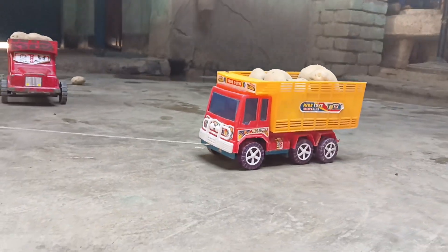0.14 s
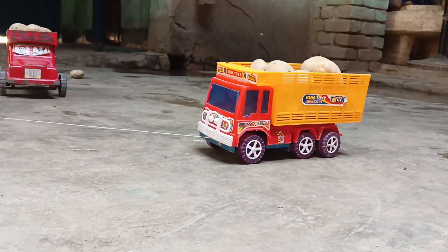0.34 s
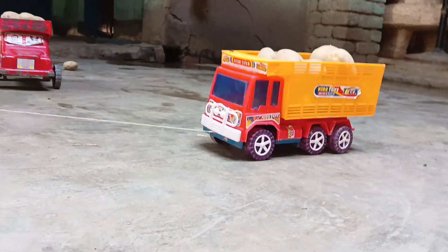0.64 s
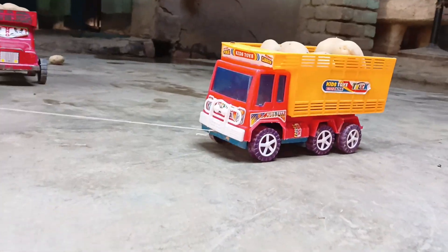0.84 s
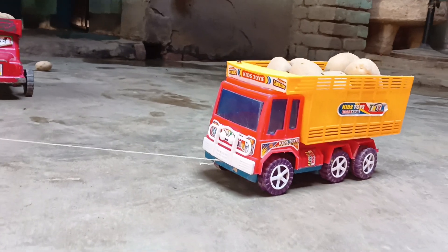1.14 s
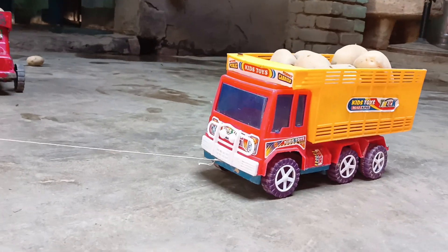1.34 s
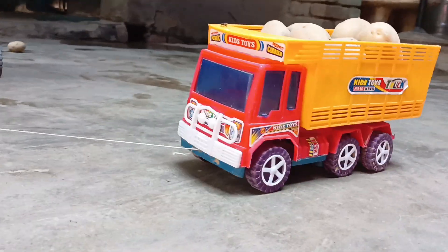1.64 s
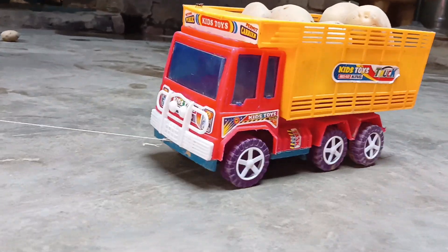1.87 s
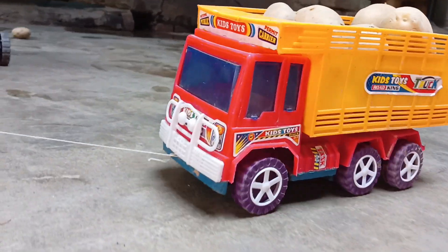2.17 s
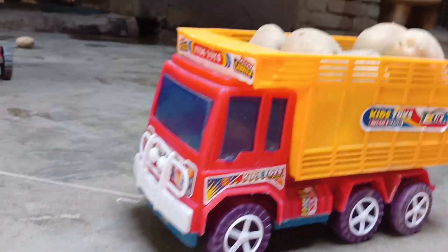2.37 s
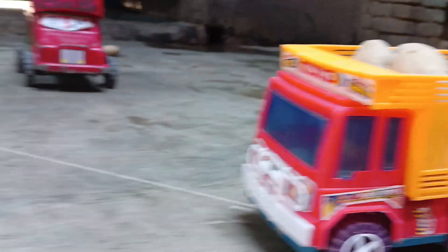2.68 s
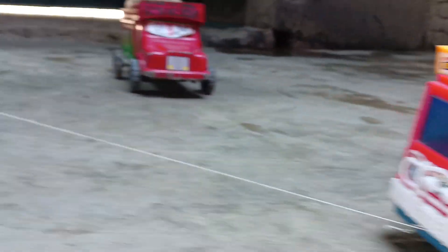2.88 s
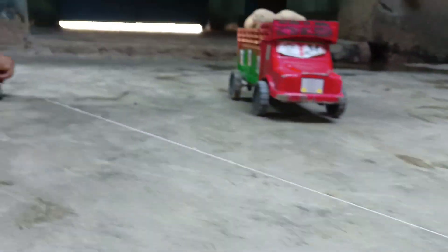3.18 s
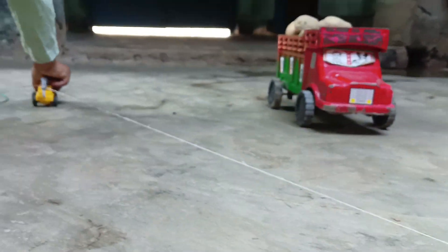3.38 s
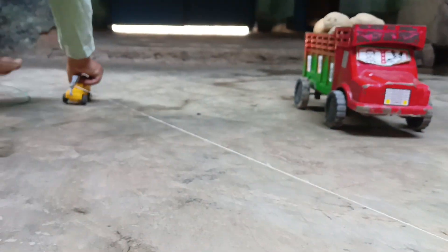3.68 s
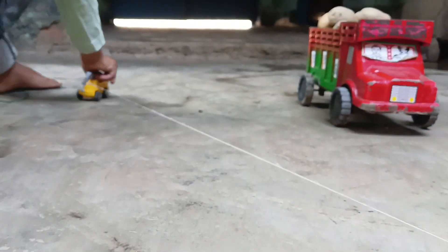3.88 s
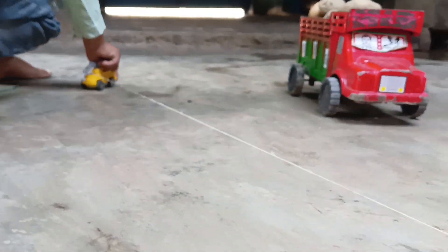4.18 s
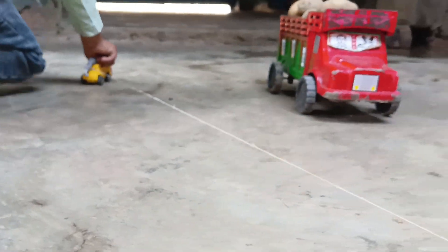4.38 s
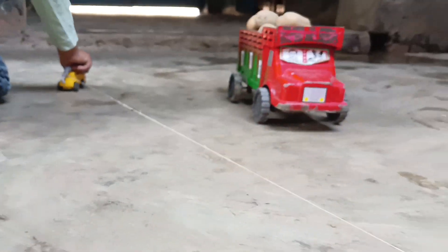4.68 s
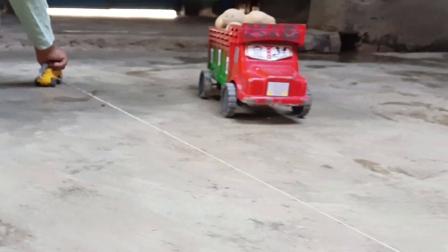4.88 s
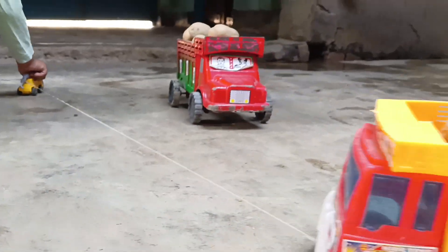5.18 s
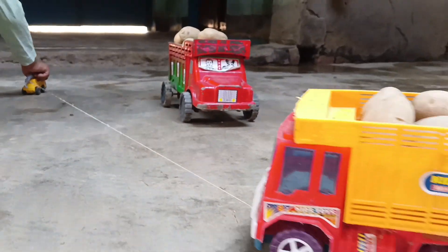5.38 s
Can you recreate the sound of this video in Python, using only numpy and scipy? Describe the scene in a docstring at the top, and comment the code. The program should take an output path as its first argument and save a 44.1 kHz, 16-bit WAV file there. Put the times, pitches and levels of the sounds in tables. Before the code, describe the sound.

A hollow plastic toy truck rattles in jerky pulls over rough concrete in a bare room, ending with one hard jolt of its load.

```python
"""Toy trucks on rough concrete

In a bare masonry room a distant toy rolls first, then a yellow truck close by, then a red one, on strings.
Random contacts, ticks and pits drive each toy's resonant colour; wheel slaps bunch the upper layers.
Tread lugs ring damped notes of the hollow body; hard parts clack and grit snaps in short noise bursts.
Soft footfalls, one hard jolt of the potato load, still air and a decaying noise tail complete the place."""
import sys
import numpy as np
from scipy import signal
from scipy.fft import rfft, irfft, next_fast_len
from scipy.io import wavfile
from scipy.ndimage import uniform_filter1d, map_coordinates

SR = 44100
rng = np.random.default_rng(int(sys.argv[2]) if len(sys.argv) > 2 else 0)


def store_pcm(level_fs):
    """Save levels as 16-bit WAV."""
    pcm = np.round(np.clip(level_fs, -1, 1) * 32767).astype(np.int16)
    wavfile.write(sys.argv[1], SR, np.atleast_2d(pcm).T)


N = 243431

# still air of the room: (frequency [Hz], relative density [dB per Hz])
AIR_COLOUR = [(15, -60), (25, -23), (69, -9), (169, 6.5), (349, 0.5), (1570, 2.5), (2490, -26),
              (4620, -13.5), (9050, -3.5), (15500, -19)]
# decay of the bare room: (frequency [Hz], t60 [s])
ROOM_DECAY = [(100, 0.89), (1000, 0.83), (3000, 0.91), (12000, 0.21)]
# footfalls: (time [s], level before the part gains [dB], centre [Hz])
FOOTFALLS = [(.631, -42, 220), (.752, -40, 190), (.835, -34, 180), (1.184, -12, 140), (1.624, -13, 112),
             (2.012, -27, 110), (3.961, -27, 134)]

# broad colour of each toy and of the juddering wheel: (frequency [Hz], relative density [dB per Hz])
DISTANT_COLOUR = [(35, -39), (60, -9), (87, -5), (120, -17), (423, -23), (1700, -19), (2530, 2),
                  (3340, -16), (3670, -14), (4740, -32), (6870, -22), (7720, -24), (9970, -10),
                  (12300, -22), (15500, -22)]
YELLOW_COLOUR = [(35, -63), (60, -17), (142, -8.5), (278, -9), (423, -7.5), (673, -6.5), (910, -3),
                 (1020, -3), (1380, -6), (1670, -4.5), (2050, -6), (2840, -4.5), (4630, -24), (9740, -7),
                 (15500, -13)]
JUDDER_COLOUR = [(35, -36), (60, -17), (145, -5), (206, -55), (385, -14), (423, -30), (721, -14),
                 (810, -40), (999, 3), (1910, 2.5), (2710, 17), (4630, -14), (6120, -6), (8670, -10),
                 (15500, -14)]
RED_COLOUR = [(35, -77), (60, -16), (142, -12), (376, -6), (546, -10), (889, -4), (1260, -8), (1520, -9.5),
              (2910, -9), (4520, -24), (6120, -18), (7200, -17), (9080, -4), (10400, -13), (15500, -13)]
# resonances standing on each colour: (frequency [Hz], width [Hz], level over the colour [dB])
DISTANT_RESONANCES = [(1850, 600, 5), (6800, 900, 3), (9000, 1500, 2)]
YELLOW_RESONANCES = [(655, 27, 6.5), (733, 52, 8.5), (1025, 170, 5), (1663, 88, 3.5), (2460, 67, 4.5),
                     (2990, 100, 3), (5800, 290, 2), (9400, 3900, 7.5)]
JUDDER_RESONANCES = [(717, 91, 9.5), (1000, 37, 3.8), (3020, 1800, 2.5), (6000, 410, 6), (8350, 1100, 10),
                     (14200, 1500, 6)]
RED_RESONANCES = [(700, 100, 1.8), (830, 130, 3.3), (1050, 66, 8.6), (1295, 73, 9.3), (2147, 49, 4.5),
                  (2700, 410, 1.5), (6250, 370, 4.2), (8650, 6600, 5.7)]
# pulls on each toy, and spells in which a wheel of the yellow truck judders:
# (start [s], length [s], hollow body gain [dB], thin panel gain [dB], grit gain [dB])
DISTANT_TUGS = [(0.0, 0.017, -55, -45.5, -46), (.12, 0.086, -51, -44, -48), (.32, 0.099, -61, -47.5, -48.5),
                (.47, 0.1, -52.5, -43.5, -50.5), (.62, 0.64, -53, -52, -66)]
YELLOW_TUGS = [(1.1, 0.1, -29.5, -35.5, -42.5), (1.29, 0.083, -25, -32.5, -44), (1.47, 0.11, -28, -35, -47),
               (1.63, 0.11, -31, -31, -36), (1.88, 0.18, -27.5, -33, -40.5),
               (2.21, 0.074, -30, -32.5, -33.5), (2.39, 0.36, -31, -36.5, -40),
               (5.12, 0.12, -27.5, -34.5, -37.5), (5.29, 0.17, -26, -27, -30.5)]
JUDDER_SPELLS = [(2.77, 0.18, -37, -30, -31), (5.09, 0.093, -34, -32.5, -33.5)]
RED_TUGS = [(2.98, 0.11, -42, -45.5, -44), (3.21, 0.032, -37.5, -35, -40), (3.34, 0.087, -40, -36, -35.5),
            (3.52, 0.097, -42, -43.5, -46), (3.7, 0.032, -34.5, -37.5, -39), (3.86, .27, -40, -42.5, -43.5),
            (4.27, 0.014, -34.5, -48, -51), (4.36, 0.084, -38.5, -38, -40), (4.49, 0.15, -28, -32.5, -30),
            (4.84, 0.11, -31, -39, -31.5)]
# a loose wheel slaps its axle: (time [s], rate [slaps per s])
WHEEL_SLAP_RATE = [(1.4, 45), (2.1, 64.5), (2.7, 99), (3.2, 74), (5.1, 72)]

# single grains of sand snap under a wheel: (time [s], level before the part gain [dB])
GRAIN_SNAPS = [(0.0546, -29), (0.3435, -31), (1.1927, -19), (1.266, -18), (1.7998, -11), (1.8286, -18),
               (1.8621, -18), (1.875, -19), (1.923, -21), (2.2503, -15), (2.538, -19), (2.8226, -7),
               (3.022, -21), (3.0649, -19), (3.1526, -18), (4.6073, -9), (5.0438, -16), (5.2392, -11)]
# a wheel skids sideways: (time [s], peak [dB], t60 [s], centre [Hz], sharpness Q [1])
WHEEL_SKIDS = [(1.724, -16, 0.13, 4600, 3), (3.21, -33, .12, 5290, 14), (3.365, -29, .12, 5500, 22.3),
               (3.418, -26, 0.039, 5330, 25)]
# hard plastic parts meet: (time [s], level before the part gains [dB], treble relative to it [dB])
PART_CLACKS = [(0.1869, -26, -10), (0.816, -24, -27), (1.1227, -15, -21), (1.5657, -19, -12),
               (1.715, -1, -22), (2.0252, -16, -10), (2.2651, -15, -10), (2.352, -14, -15),
               (2.538, -19, -9), (3.1518, -20, -8), (3.4235, -14, -13), (3.7677, -21, -14),
               (3.7787, -18, -12), (3.8221, -22, -18), (4.7006, -20, -8), (4.9905, -16, -7),
               (5.028, -9, -14), (5.0882, -9, -13), (5.0998, -8, -11), (5.1651, -12, -11),
               (5.2588, -6, -17)]
# the hardest bumps knock the body, and the last row is the load rebounding after its jolt: (time [s], level
# before the part gains [dB], note [Hz])
LUG_KNOCKS = [(0.882, -29, 697), (1.012, -19, 926), (1.064, -13, 1070), (1.117, -14, 732),
              (1.203, -14, 689), (1.372, -13, 980), (1.386, -12, 1070), (1.415, -12, 972),
              (1.458, -12, 974), (1.548, -16, 654), (1.65, -11, 1060), (1.87, -11, 1000),
              (2.012, -13, 1030), (2.142, -15, 1040), (2.537, -20, 770), (2.766, -15, 1030),
              (3.53, -28, 1010), (3.716, -23, 1020), (4.251, -23, 942), (4.568, -12, 867),
              (5.085, -12, 1070), (5.33, -12, 1120)]
# the load jolts against the bed and bounces: (time [s], peak of each blow [dB])
LOAD_JOLTS = [(5.2622, -2.5), (5.2665, -6.5)]
# modes of the loaded bed: (frequency [Hz], relative level [dB], t60 [s])
BED_MODES = [(669, -8.5, 0.12), (896, 5, 0.023), (1115, 9.5, 0.044), (1350, -16, .053), (1594, 5, 0.032),
             (1940, 9.5, 0.012)]

HIT_SIZE = 8192  # samples in one impact or impulse response
HIT_T = np.arange(HIT_SIZE) / SR
HIT_HZ = np.fft.rfftfreq(HIT_SIZE, 1 / SR)
TOP_HZ = 15900  # band limit of the phone
KNOCK_PANEL_DB = -9.5  # panel rattle of a knock, over its table level
CLACK_HZ, CLACK_SCATTER = 2583, 0.067  # panel note, and its spread in natural-log pitch
EDGE_DB = 8.5  # bright edge of a clack, over its treble level
SNAP_HZ, SNAP_SCATTER = 9900, 0.08  # pitch of a grain, and its spread in natural-log pitch
PATCHES_PER_S, PATCH_DB = 16, 1.83  # sandy and smooth floor patches: rate, spread of the grit level


def amp(db):
    """Decibels to gain."""
    return 10 ** (np.asarray(db) / 20)


def unit(x):
    """Scale to rms 1."""
    return x / np.sqrt(np.mean(x ** 2) + 1e-20)


def along(points, hz):
    """Read (Hz, value) points on a log frequency axis."""
    f, v = np.transpose(points)
    return np.interp(np.log(hz + 1), np.log(f + 1), v)


def curves(rows):
    """One value per sample for each column after the time."""
    s, *cols = np.transpose(rows)
    return [np.interp(np.arange(N) / SR, s, c) for c in cols]


def add(track, s, sound):
    """Mix a sound in at time s."""
    start = round(s * SR)
    track[start:start + len(sound)] += sound[:N - start]


def ring(gain):
    """Causal impulse response with the shape of a gain on HIT_HZ, its peak gain set to 1."""
    cepstrum = irfft(np.log(np.maximum(gain / gain.max(), 1e-6)))
    # folding the cepstrum forward in time makes the response minimum-phase
    fold = 1 + np.sign(HIT_SIZE // 2 - np.arange(HIT_SIZE))
    fold[0] = 1
    return irfft(np.exp(rfft(cepstrum * fold)))


def through(x, gain):
    """Send x through a causal colour."""
    return signal.fftconvolve(x, ring(gain))[:len(x)]


def colour(spectrum, resonances):
    """Gain of a broad spectrum with resonances standing on it."""
    peaks = sum(db / (1 + (2 * (HIT_HZ - hz) / width) ** 2) for hz, width, db in resonances)
    return amp(along(spectrum, HIT_HZ) + peaks)


def below(hz, order=6):
    """Low-pass gain."""
    return 1 / np.sqrt(1 + (HIT_HZ / hz) ** (2 * order))


def above(hz, order=6):
    """High-pass gain."""
    return np.sqrt(1 - below(hz, order=order) ** 2)


def bump(hz, q):
    """Gain of one resonance."""
    return 1 / np.sqrt(1 + q ** 2 * ((HIT_HZ + 1) / hz - hz / (HIT_HZ + 1)) ** 2)


def strike(gain, t60):
    """A rough contact, a noise burst decaying over t60, rings a colour; peak 1."""
    hit = through(rng.standard_normal(HIT_SIZE) * amp(-60 * HIT_T / t60), gain)
    return hit / np.abs(hit).max()


def note(hz, t60, attack):
    """One damped resonance set going by a push with a soft onset."""
    return np.sin(2 * np.pi * hz * HIT_T) * amp(-60 * HIT_T / t60) * (1 - np.exp(-HIT_T / attack))


def ticks(rate, low_hz, high_hz, cycles, spread_db):
    """Small impacts, each on another spot with its own pitch, ringing for some cycles; rms 1."""
    chance = rng.random((int(rate * N / SR), 3))
    hz = low_hz * (high_hz / low_hz) ** chance[:, :1]
    n = np.arange(int(cycles / low_hz * SR))
    turns = hz * n / SR
    age = turns / cycles
    size = amp(spread_db * chance[:, 1:2] ** 2)
    grains = size * np.sin(2 * np.pi * turns) * age * np.exp(-np.log(1000) * age)
    at = (chance[:, 2:] * N).astype(int) + n
    return unit(np.bincount(at.ravel(), grains.ravel(), N)[:N])


def still_air():
    """Steady noise in the colour of the quiet room."""
    return amp(-50.5) * unit(through(rng.standard_normal(N), amp(along(AIR_COLOUR, HIT_HZ))))


def room(x):
    """Bare walls answer after a 12 ms delay; the highest treble dies first."""
    hz, t, z = signal.stft(rng.standard_normal(SR), SR, nperseg=256)
    decay = amp(-60 * t / along(ROOM_DECAY, hz)[:, None])
    tail = signal.istft(z * decay, SR, nperseg=256)[1]
    tail = np.pad(tail, (round(.012 * SR), 0))
    return signal.fftconvolve(x, tail / np.linalg.norm(tail))[:N]


def footfalls():
    """A heel gives one dull push on the concrete, and the sole settles in a longer low burst."""
    out = np.zeros(N)
    for s, db, hz in FOOTFALLS:
        heel = note(hz, t60=.034, attack=.002)
        sole = strike(above(110, order=4) * below(300, order=4), t60=.075)
        add(out, s, amp(db + 4.5) * heel)
        add(out, s, amp(db - 3.5) * sole)
    return out


def jolt():
    """The load hits the hollow bed, which rings in its modes; then the potatoes tumble to rest."""
    out = np.zeros(N)
    bed = sum(amp(db) * note(hz, t60, attack=0.00034) for hz, db, t60 in BED_MODES)
    bed = through(bed, above(360, order=3) * below(3100, order=3))
    for s, db in LOAD_JOLTS:
        add(out, s, amp(db) * bed / np.abs(bed).max())
    tumble = unit(ticks(600, 1000, 2300, cycles=14, spread_db=6)[:SR // 2])
    fade_db = -16.5 - 60 * np.arange(SR // 2) / SR / 0.24  # t60 0.24 s
    add(out, LOAD_JOLTS[-1][0] + 0.012, amp(fade_db) * tumble)
    return out


def sand():
    """Single grains snap under the wheels, and sideways skids rasp over them."""
    out = np.zeros(N)
    for s, db in GRAIN_SNAPS:
        hz = SNAP_HZ * np.exp(SNAP_SCATTER * rng.standard_normal())
        snap = strike(bump(hz, q=7) * above(6500), t60=.01)
        add(out, s + .0015, amp(db - .5) * snap)
    for s, db, t60, hz, q in WHEEL_SKIDS:
        add(out, s, amp(db) * strike(bump(hz, q) * below(6200) * above(1500), t60=t60))
    return out


def clacks():
    """Hard parts meet briefly: a panel note, a dry crack and a bright edge."""
    out, truck = np.zeros(N), colour(YELLOW_COLOUR, YELLOW_RESONANCES)
    for s, db, treble_db in PART_CLACKS:
        hz = CLACK_HZ * np.exp(CLACK_SCATTER * rng.standard_normal())
        crack_t60 = 0.016 * amp(-db / 3)  # light touches rattle on, a hard blow is over sooner
        add(out, s, amp(db + 3) * note(hz, t60=.007, attack=.0005))
        add(out, s, amp(db - 4.5) * strike(above(1600) * below(3500), crack_t60))
        add(out, s, amp(db + treble_db + EDGE_DB) * strike(truck * above(4800), t60=.018))
    return out


def knocks():
    """Each lug lands, or the load rebounds, and rings one note of the hollow body, with a rough thud and a
    panel rattle."""
    out, truck = np.zeros(N), colour(YELLOW_COLOUR, YELLOW_RESONANCES)
    for s, db, hz in LUG_KNOCKS:
        thud = strike(truck * above(500) * below(1900), t60=.018)
        rattle = strike(truck * above(1500) * below(2800), t60=.028)
        add(out, s, amp(db + 5.5) * note(hz, t60=.025, attack=.0018))
        add(out, s, amp(db - 6) * thud)
        add(out, s, amp(db + KNOCK_PANEL_DB) * rattle)
    return out


def contacts(rate, spread_db):
    """Tiny random impacts of uneven size on the rough floor; rms 1."""
    hits = rng.random(N) < rate / SR
    signs = rng.choice([-1, 1], N)
    sizes = amp(spread_db * np.clip(rng.standard_normal(N), -2, 2))
    return unit(hits * signs * sizes)


def slaps(rate, jitter, size_db, t60):
    """Power envelope of a loose wheel slapping its axle at an uneven rate; mean 1."""
    turns = np.cumsum(rate) / SR
    chance = rng.uniform(-1.2, 1, (int(turns[-1]), 2))
    at = np.searchsorted(turns, np.arange(len(chance)) + jitter * chance[:, 0])
    pulses = np.bincount(at, amp(size_db * chance[:, 1]) ** 2, N + 1)[:N] / rate
    power = np.abs(signal.fftconvolve(pulses, amp(-60 * HIT_T / t60) ** 2)[:N])
    return power / power.mean()


def pulled(pulls, rise_db_per_s, coast_db_per_s):
    """A toy swells into each pull, holds and fades as it coasts; gains of body, panels and grit."""
    t = np.arange(0, N, 64) / SR
    each = []
    for start, length, *levels in pulls:
        rise_db = rise_db_per_s * np.maximum(start - t, 0)
        coast_db = coast_db_per_s * np.maximum(t - start - length, 0)
        each.append(np.array(levels)[:, None] - rise_db - coast_db)
    # the loudest pull at each moment prevails
    return curves(np.column_stack([t, *amp(np.max(each, axis=0))]))


def wander(x, depth_db):
    """As a truck moves, its paths over the floor to the microphone change and its colour drifts."""
    z = signal.stft(x, nperseg=512)[2]
    field = rng.standard_normal(z.shape)
    for _ in range(2):
        field = uniform_filter1d(uniform_filter1d(field, size=7, axis=0), size=22, axis=1)
    return signal.istft(z * amp(depth_db * unit(field)), nperseg=512)[1][:N]


def rolling():
    """Roughness shakes body and panels and grinds grit; slaps bunch the contacts, pits jar the toy."""
    slap = slaps(curves(WHEEL_SLAP_RATE)[0], jitter=.3, size_db=5, t60=.025)
    pits = contacts(45, spread_db=3)
    patch_at = np.arange(N) * PATCHES_PER_S / SR
    patches = amp(PATCH_DB * map_coordinates(rng.standard_normal(256), [patch_at], mode="wrap"))
    # each layer: band, broad rubbing, ticks
    # ticks hold all their power inside one band, so they need less gain than the broad rubbing
    body = (below(1564), contacts(3000, spread_db=2.5),
            amp(-14) * ticks(170, 485.0, 1604, cycles=18.0, spread_db=10))
    panels = (above(1414) * below(6430), contacts(5000, spread_db=2.5),
              amp(-8.5) * ticks(300, 1527, 4200, cycles=29.4, spread_db=12))
    grit = (above(4900), contacts(11000, spread_db=2.5),
            amp(-4) * ticks(750, 6500, 15800, cycles=24, spread_db=13))

    def toy(gains, timbre, slap_share, tick_share, pits_db):
        """The three layers of one toy, each driven by rubbing, ticks and pits through its timbre."""
        loose, rattle = np.clip([slap_share, tick_share], 0, .95)

        def part(gain, band, rub, clatter):
            """One layer: its mixed drive rings the toy's timbre within its band."""
            h = ring(timbre * band)
            drive = np.sqrt(1 - rattle) * rub + np.sqrt(rattle) * clatter + amp(pits_db) * pits
            return signal.oaconvolve(gain * drive, h / np.linalg.norm(h))[:N]

        low, middle, high = (part(gain, *layer) for gain, layer in zip(gains, (body, panels, grit)))
        slapping = np.sqrt(1 - loose + loose * slap)
        return low + slapping * (middle + patches * high)

    distant = toy(pulled(DISTANT_TUGS, rise_db_per_s=155, coast_db_per_s=130),
                  colour(DISTANT_COLOUR, DISTANT_RESONANCES),
                  slap_share=0.17, tick_share=0.28, pits_db=-10)
    yellow = toy(pulled(YELLOW_TUGS, rise_db_per_s=102, coast_db_per_s=37),
                 colour(YELLOW_COLOUR, YELLOW_RESONANCES),
                 slap_share=0.55, tick_share=0.47, pits_db=-9.5)
    judder = toy(pulled(JUDDER_SPELLS, rise_db_per_s=50, coast_db_per_s=247),
                 colour(JUDDER_COLOUR, JUDDER_RESONANCES),
                 slap_share=0.8, tick_share=.15, pits_db=-16)
    red = toy(pulled(RED_TUGS, rise_db_per_s=181, coast_db_per_s=109),
              colour(RED_COLOUR, RED_RESONANCES),
              slap_share=0.3, tick_share=0.32, pits_db=-20)
    return wander(distant + yellow + judder + red, depth_db=1.74)


def scene():
    """Trucks, footfalls and load, heard direct and by way of the room, over still air."""
    roll = rolling()
    hits = knocks() + clacks() + sand()
    steps, load = footfalls(), jolt()
    to_room = amp(-12.5) * roll + amp(-8.0) * hits + amp(-8) * steps + amp(-12.0) * load
    air = still_air()
    return (roll + hits + steps + load + room(to_room) + air)[None]


def record(dry):
    """The phone microphone thins the deepest bass and keeps nothing above its band limit."""
    size = next_fast_len(N + SR // 2)
    hz = np.fft.rfftfreq(size, 1 / SR)
    thinned = through(dry[0], above(70.5, order=4))
    return irfft(rfft(thinned, size) * (hz < TOP_HZ), size)[None, :N]


dry = scene()
out = record(dry)
store_pcm(out)
```